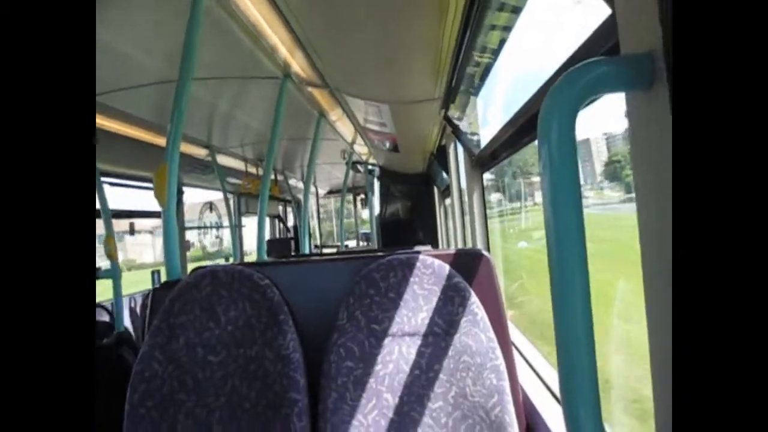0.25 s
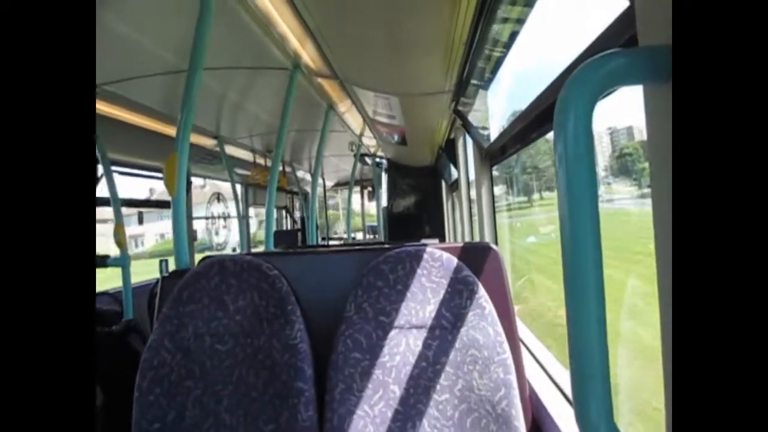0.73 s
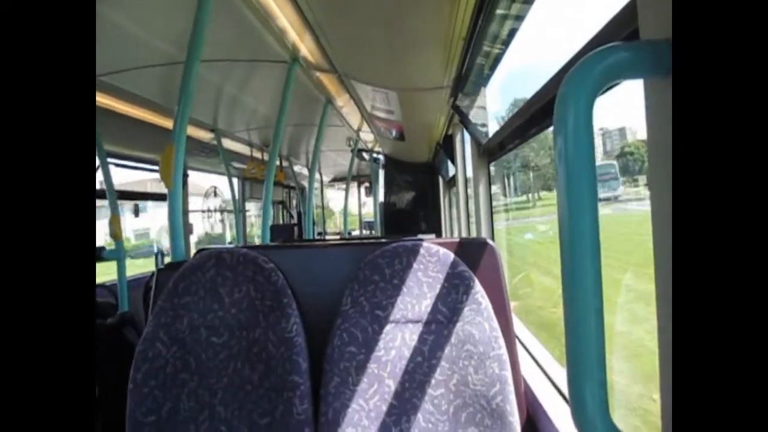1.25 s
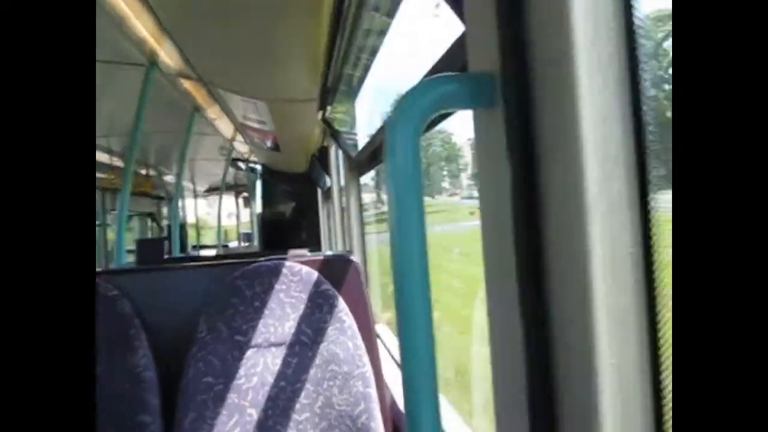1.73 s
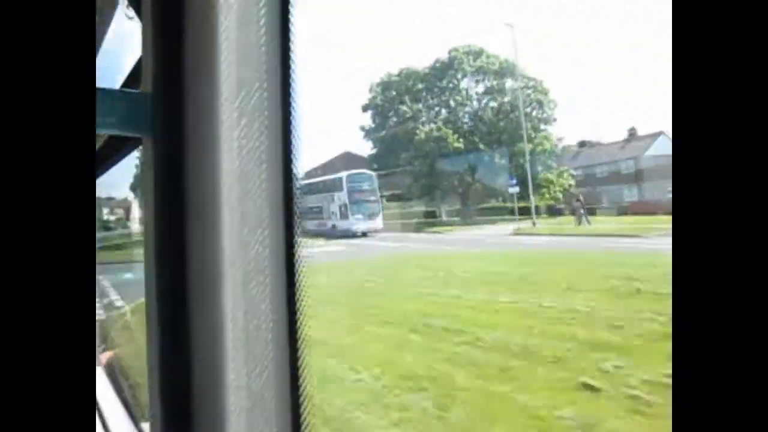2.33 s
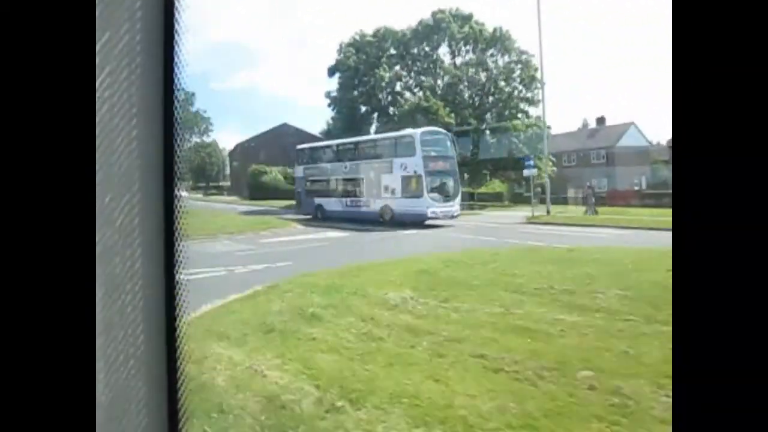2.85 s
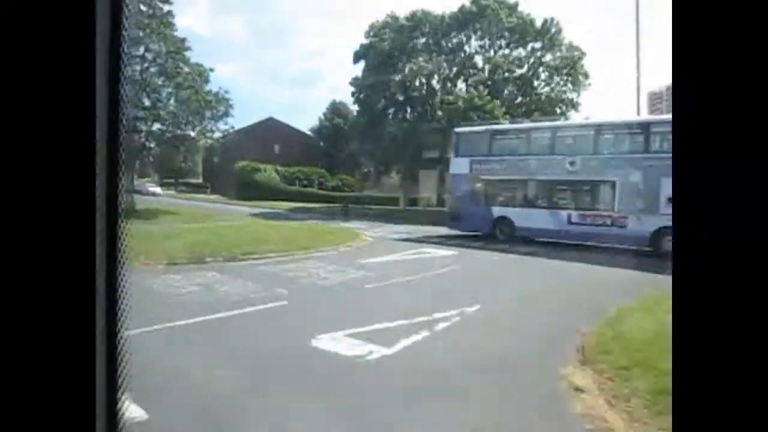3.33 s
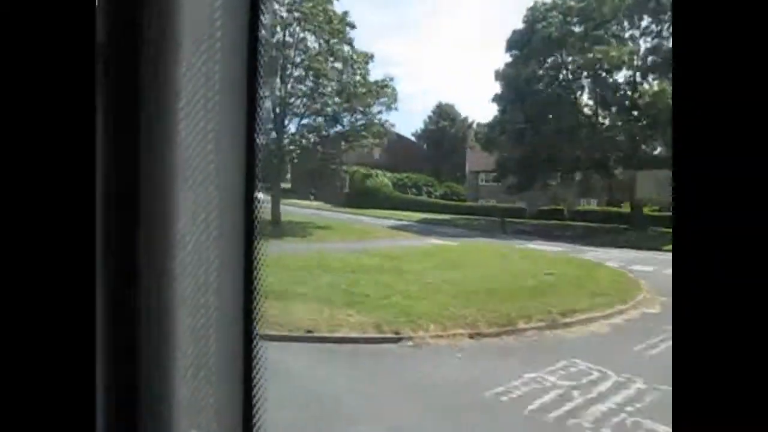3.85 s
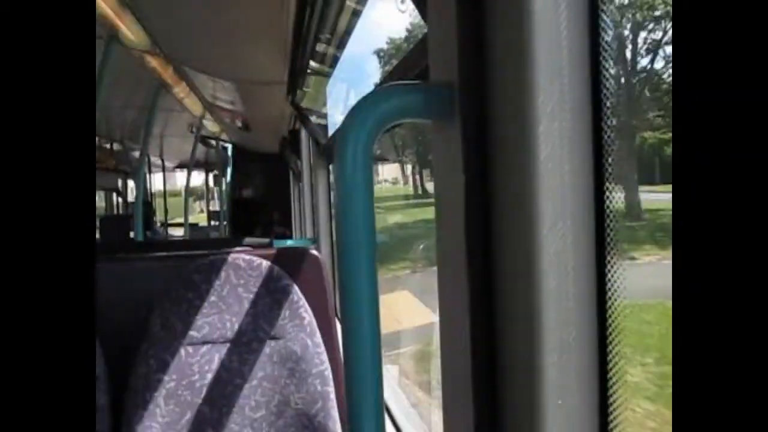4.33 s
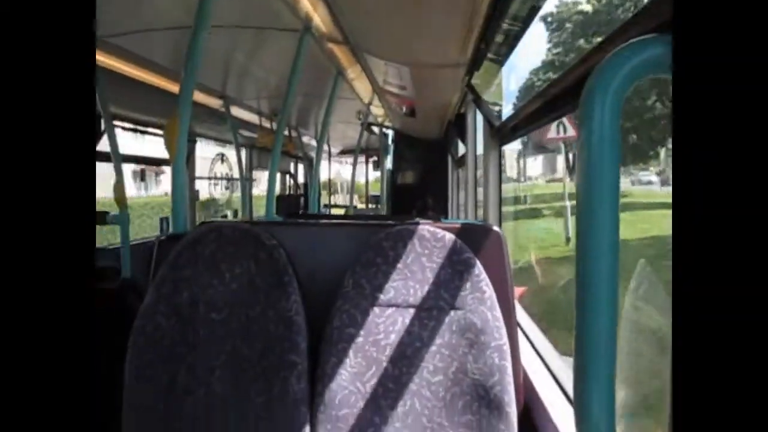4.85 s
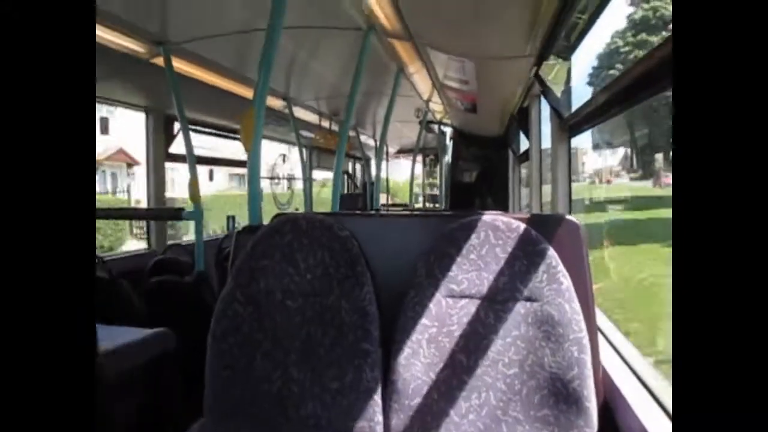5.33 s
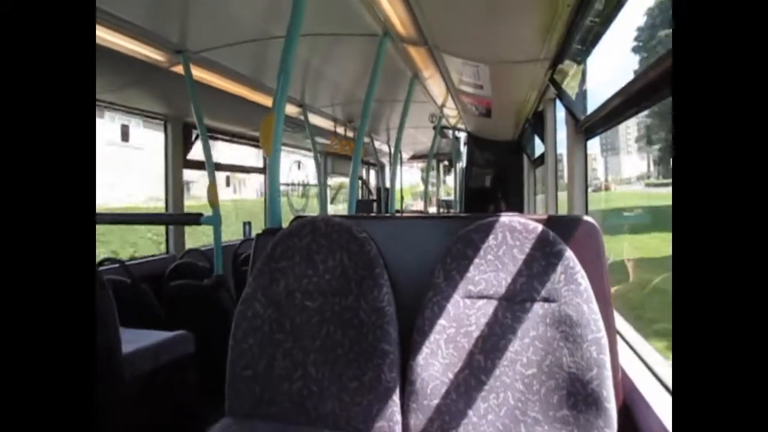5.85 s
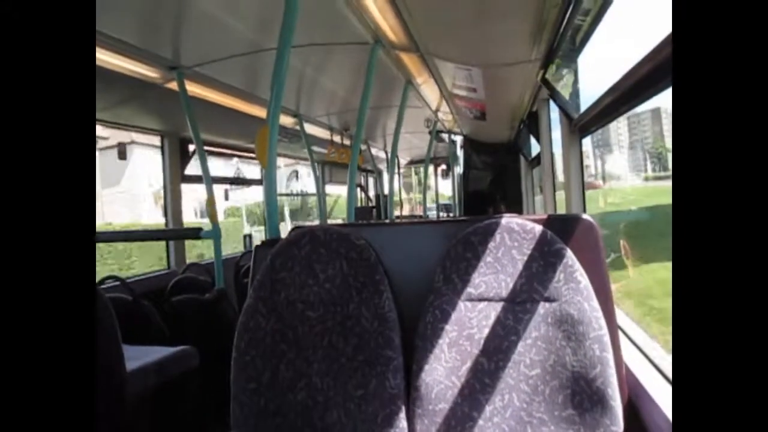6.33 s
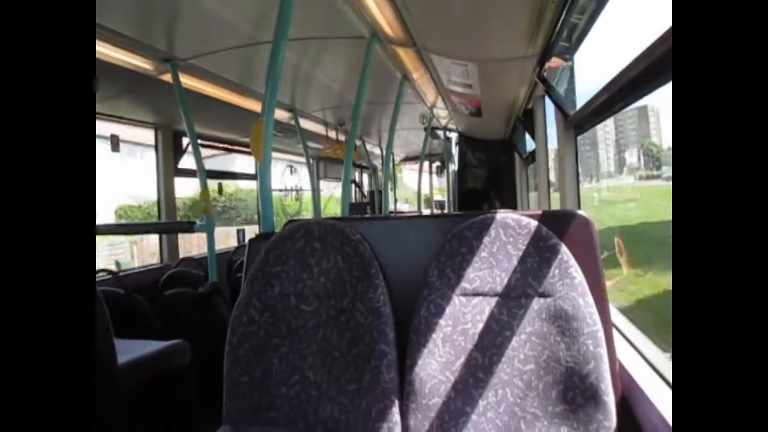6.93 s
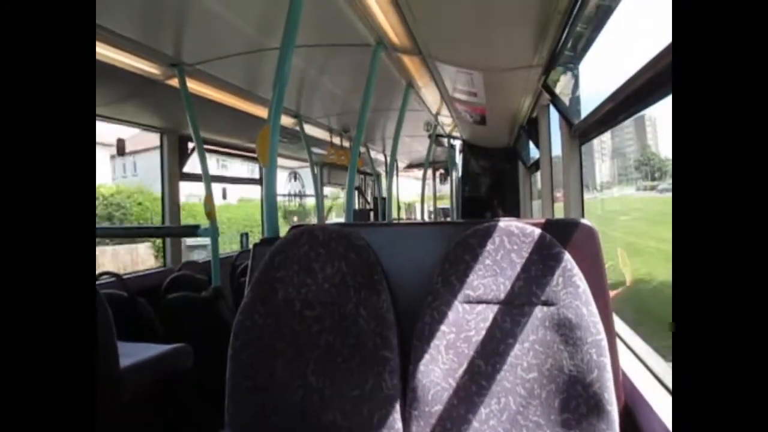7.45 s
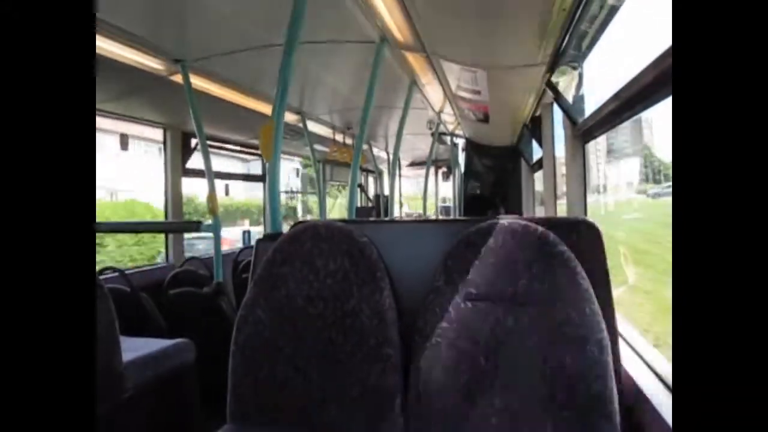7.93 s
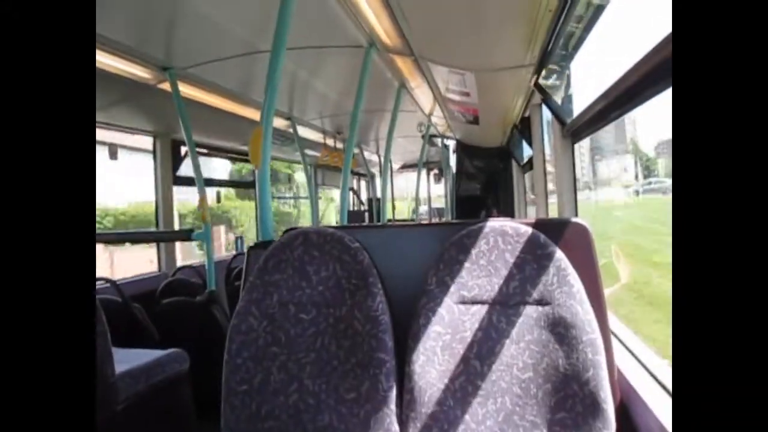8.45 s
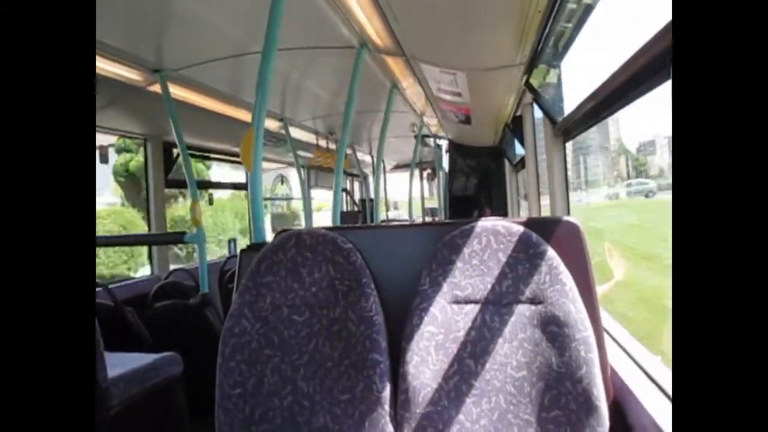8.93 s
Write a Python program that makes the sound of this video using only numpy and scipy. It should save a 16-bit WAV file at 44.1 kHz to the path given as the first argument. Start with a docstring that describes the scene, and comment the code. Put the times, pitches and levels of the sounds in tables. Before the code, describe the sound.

A small handheld microphone inside a bus picks up a nasal fan hum, engine boom, tyre roar and hissing air. Tiny metallic chirps come first, then a cluster of thumping gusts that briefly push everything down. More quick squeaks chatter, then harsher scrapes and faint ticks from the window frame. Afterwards mostly steady droning remains, its pitch finally sinking.

```python
"""Rear seats of a moving bus beside an open window: fan and engine sines over bands of road and air noise.
It opens on three handrail squeaks, slips that ring the rail; hard gusts of dull noise follow from 1.2 s.
Long squeak runs come from 2.4 s, then rougher ones around 5 s, where the detail thins for instants.
Bright window-frame ticks are scattered from 1.5 s on. The fan sags, steadies, and sags again at the end.
Throughout, the microphone's gain control ducks under loud moments and recovers."""
import sys
import numpy as np
from scipy import signal
from scipy.io import wavfile
from scipy.ndimage import uniform_filter1d

SR = 44100
rng = np.random.default_rng(int(sys.argv[2]) if len(sys.argv) > 2 else 0)


def int16_out(signal):
    """Quantize to a 16-bit WAV file."""
    q = np.round(np.clip(np.atleast_2d(signal).T, -1, 1) * 32767)
    wavfile.write(sys.argv[1], SR, q.astype(np.int16))


N = 405258  # length in samples

# Source levels below are those ahead of the microphone's gain control.
# cooling fan curve: time_s, blade_rate_hz, fundamental_db, second_harmonic_db, third_harmonic_db (rms)
FAN_CURVE = [(0, 286, -34, -34, -36.5), (1.2, 284, -34.5, -36, -37), (1.86, 281, -31, -35, -41),
             (2.0, 280.5, -32.5, -28, -48), (3.42, 277.5, -34.5, -29.5, -46),
             (3.55, 277, -34.5, -42.5, -43), (4.07, 275, -33.5, -40.5, -44), (4.25, 274, -31, -28.5, -43),
             (5, 274, -29.5, -26.5, -46), (6, 274.8, -29, -27.5, -47.5), (8, 276.5, -29, -26.5, -47),
             (8.5, 274.5, -28, -27, -45), (8.85, 271.5, -27, -26.5, -46), (9.19, 266.5, -27, -27.5, -48)]
# two low engine tones that swell and fade: time_s, exhaust_boom_db, axle_hum_db (rms)
LOW_TONE_CURVE = [(0, -25, -36.5), (1.3, -24.5, -29.5), (2.8, -36, -32.5), (3.5, -38, -37.5),
                  (4.07, -29.5, -29.5), (4.7, -39, -35), (5.8, -32.5, -35.5), (7.7, -31.5, -33.5),
                  (8.3, -29, -38), (9.19, -40, -22.5)]
# steadier engine and axle tones: order (multiple of the blade rate), level_db (rms), waver_db
SHAFT_ORDERS = [(.167, -38, 3.5), (.2, -28.5, 1.5), (0.276, -30.5, 4), (0.304, -32, 1.5), (0.337, -36, 2),
                (0.437, -40.5, 0), (0.501, -35, 4), (0.553, -35.5, 3), (0.604, -27.5, 3.5),
                (.666, -39, 3.5), (1.13, -45.5, 0.5), (1.31, -42.5, 4), (1.55, -35, 2.5),
                (2.33, -43.5, 2.5), (3.1, -39, 1.5)]
# handrail squeaks: start_s, slip_strength_db, starting_slip_rate_hz, roughness (0-1), length_s
SQUEAKS = [(0.029, -18.5, 754, 0.3, 0.02), (0.128, -24, 750, 0.4, 0.017), (0.211, -23, 744, .45, 0.015),
           (2.394, -27, 752, 0.5, 0.017), (2.472, -25, 750, .4, 0.019), (2.587, -23, 753, .15, 0.026),
           (2.683, -17.5, 750, 0.12, 0.019), (2.768, -19.5, 750, 0.14, 0.019),
           (2.857, -20, 745, 0.25, 0.017), (2.938, -24.5, 740, 0.1, 0.022), (3.018, -31.5, 748, 0.6, 0.017),
           (3.305, -27.5, 767, 0.15, .023), (3.394, -26.5, 748, 0.4, 0.022), (3.564, -26, 757, 0.2, .018),
           (3.658, -30, 750, 0.3, 0.016), (3.75, -23.5, 970, .03, 0.0097), (4.011, -25.5, 865, .45, 0.018),
           (5.043, -25.5, 743, 0.5, 0.026), (5.154, -22.5, 900, 0.92, 0.015),
           (5.27, -18.5, 755, 0.77, .013), (5.358, -13, 900, 0.73, .016), (5.451, -17.5, 900, 0.6, 0.013),
           (5.531, -30.5, 910, .9, 0.013), (5.835, -28, 883, 0.1, 0.0087), (5.975, -28, 774, .4, .012),
           (7.763, -26.5, 970, 0.64, 0.013), (8.482, -25.5, 762, .1, 0.017)]
# handrail ringing modes: pitch_hz, average_level_db, t60_s
RAIL_MODES = [(890, -8.5, 0.03), (1470, -10, 0.045), (2010, -17.5, 0.027), (2260, -4.5, 0.072),
              (2580, -1, 0.0083), (3620, -9, 0.048), (4280, -23, 0.017), (5325, -9, 0.025)]
# gusts on the microphone: start_s, peak_db, length_s
GUSTS = [(1.229, 1, .004), (1.243, 3, .028), (1.277, -4, .004), (1.350, -1, .010), (1.474, -6, .048),
         (1.523, -2, .005), (1.535, 6, .008), (1.552, -1, .024), (1.596, -4, .003), (1.609, 3, .011),
         (1.630, -6, .01), (1.776, -11, .03), (2.034, -10, .026), (2.059, -7, .012), (2.48, -9, .04),
         (2.78, -8, .02), (3.064, -7, .018), (3.083, -6, .005), (3.156, -9, .018), (4.039, -10, .02),
         (4.278, -7, .015), (5.04, -8, .025), (6.14, -9, .025)]
# noise level curve: time_s, road_roar_db, air_rush_db (rms)
NOISE_CURVE = [(0.0, -25.5, -29), (0.3, -25, -32), (1.1, -24.5, -31), (1.53, -19.5, -29.5),
               (1.9, -23, -31.5), (2.8, -25.5, -31.5), (3.1, -25.5, -35), (3.6, -21, -31),
               (4.5, -25, -30.5), (5.35, -27, -30), (6.3, -25, -32), (8.0, -25, -30.5),
               (9.19, -24.3, -30.5)]
# spectral shapes of the three noises: frequency_hz, relative_density_db (per Hz)
RUMBLE_SHAPE = [(18, -9), (35, 4), (60, -2.5), (100, -0.5), (160, 0.9), (220, -1), (260, -9), (320, -14)]
ROAR_SHAPE = [(250, -7), (320, -2), (450, -5), (600, -4), (860, -7.5), (1050, -15.5), (1400, -15.5)]
RUSH_SHAPE = [(1100, -1.5), (1500, -1.5), (2100, -5.5), (3000, -5), (4000, -8), (5500, -7.5), (7500, -17),
              (11000, -8)]
# thin ticks of the window frame: start_s, level_db (of the grit before its high-pass)
TICKS = [(1.457, -25), (2.566, -21), (5.078, -24), (5.314, -22), (5.736, -27), (5.981, -28), (6.805, -26),
         (8.758, -26)]
# instants of thinned detail: start_s, length_s
DROPOUTS = [(5.0825, 0.0018), (5.1, 0.0064), (5.308, 0.0023), (5.442, 0.0038)]

BOOM_ORDER, HUM_ORDER = 0.4, 0.775  # multiples of the blade rate
RISE_FROM_DB, RISE_PER_DB = -28, 0.23  # stronger squeaks speed up more at their end
GUST_TOP_HZ, GUST_HZ_PER_DB = 1110, 58.5  # harder gusts reach higher
RUMBLE_DB = -22.5
CABIN_T60_S, CABIN_DB = 0.13, -6.5
LIMIT_DB, RELEASE_DB_S, ATTACK_S = -8, 46, 0.0008  # gain control; release in dB per second
MIC_TOP_HZ, HISS_DB, CUTOFF_HZ = 6070, -65, 15760


def from_db(db):
    """Turn decibels into a gain."""
    return 10 ** (np.asarray(db) / 20)


def rms_one(x):
    """Scale a signal to unit rms."""
    return x / np.sqrt(np.mean(x ** 2) + 1e-20)


def in_time(rows):
    """Read the columns of a curve table, one value per sample."""
    time_s, *columns = np.transpose(rows)
    return [np.interp(np.arange(N) / SR, time_s, column) for column in columns]


def drift(rate_hz):
    """Wander slowly with spread 1: noise every 40 samples through two one-pole low-passes, run in."""
    r = np.exp(-2 * np.pi * rate_hz * 40 / SR)
    sparse = rng.standard_normal(N // 40 + 2002)
    slow = signal.lfilter([1], [1, -2 * r, r * r], sparse)[2000:]
    return np.interp(np.arange(N) / 40, np.arange(len(slow)), rms_one(slow))


def ring(clicks, hz, t60_s):
    """Ring a resonator: each unit click starts a decaying sine of height 1."""
    r = from_db(-60 / (t60_s * SR))
    w = 2 * np.pi * hz / SR
    return signal.lfilter([0, np.sin(w)], [1, -2 * r * np.cos(w), r * r], clicks + 1e-18)


def banded_noise(shape, patchy_db, together_db):
    """Sum third-octave noise bands, each with its own level and flicker, plus a shared swell; rms 1."""
    hz, density_db = np.transpose(shape)
    edges = hz[0] * 2 ** np.arange(0, np.log2(hz[-1] / hz[0]) + 0.1, 1 / 3)
    white = rng.standard_normal((2, N))  # neighbouring bands take turns on two noises
    out = 0
    for k, (low, high) in enumerate(zip(edges, edges[1:])):
        band_pass = signal.butter(2, [low, high], "band", fs=SR, output="sos")
        band = signal.sosfilt(band_pass, white[k % 2])
        band_db = np.interp(np.log(low * high) / 2, np.log(hz), density_db)
        out = out + band * from_db(band_db + patchy_db * drift(4.7))
    return rms_one(out * from_db(together_db * drift(19.7)))


def fan_and_engine():
    """Fan harmonics, engine and axle orders follow one shaft speed; each wavers in level and phase."""
    blade_hz, *fan_db = in_time(FAN_CURVE)
    turn = 2 * np.pi * np.cumsum(blade_hz) / SR
    out = np.zeros(N)
    curve_orders = [1, 2, 3, BOOM_ORDER, HUM_ORDER]
    for order, level_db in zip(curve_orders, fan_db + in_time(LOW_TONE_CURVE)):
        gain = from_db(level_db + 1.0 * drift(7))
        out += gain * np.sin(order * turn + 0.2 * drift(4))
    for order, level_db, waver_db in SHAFT_ORDERS:
        gain = from_db(level_db + waver_db * np.tanh(drift(2.14)))  # tanh bounds the waver
        out += gain * np.sin(order * turn + 1.31 * drift(4.0))
    return np.sqrt(2) * out  # table levels are rms


def handrail():
    """Stick-slip: each run of slips swells, may speed up at its end, and rings the rail at another spot."""
    slips, spot_db = np.zeros(N), np.zeros((len(RAIL_MODES), N))
    for start_s, strength_db, slip_hz, rough, length_s in SQUEAKS:
        u = np.linspace(0, 1, round(length_s * SR))
        rough = np.clip(rough, 0, 1)
        rise = max(RISE_PER_DB * (strength_db - RISE_FROM_DB), 0)
        slip_count = np.floor(np.cumsum(slip_hz * (1 + rise * u ** 3.5)) / SR)
        regular = np.diff(slip_count, prepend=0)  # one click per slip
        scrape = 0.22 * rms_one(rng.standard_normal(2000)[:len(u)])  # grit blurs the regular slips
        swell = (0.36 + 0.6 * u ** 3.1) * np.minimum(1, 5 * (1 - u))
        start = round(start_s * SR)
        run = slice(start, start + len(u))
        slips[run] += from_db(strength_db) * swell * ((1 - rough) * regular + rough * scrape)
        spot_db[:, run] = 1.5 * rng.standard_normal((len(RAIL_MODES), 1))
    modes = np.zeros(N)
    for k, (hz, level_db, t60_s) in enumerate(RAIL_MODES):
        modes += (-1) ** k * ring(slips * from_db(level_db + spot_db[k]), hz, t60_s)
    # the damped mounting passes the glide itself
    contact = ring(slips, 1960, 0.0021) + 1.1 * ring(slips, 3780, 0.0009)
    return modes + from_db(10.5) * contact


def gusts():
    """Each gust is a lump of dull turbulent pressure right at the microphone port."""
    out = np.zeros(N)
    for start_s, peak_db, length_s in GUSTS:
        size = round(length_s * SR)
        top_hz = max(GUST_TOP_HZ + GUST_HZ_PER_DB * peak_db, 300)
        lump = rng.standard_normal(4000)
        lump[size:] = 0  # room left for the filters to settle
        lump[:size] *= np.hanning(size) ** 0.3  # it swells and fades
        lump = signal.sosfilt(signal.butter(2, [120, top_hz], "band", fs=SR, output="sos"), lump)
        # large eddies carry the most pressure: low-pass at 450 Hz
        lump = signal.lfilter([1], [1, -np.exp(-2 * np.pi * 450 / SR)], lump)
        start = round(start_s * SR)
        out[start:start + 4000] += from_db(peak_db) * lump / np.abs(lump).max()
    return out


def window_ticks():
    """Each tick is a few milliseconds of bright, quickly decaying grit."""
    out = np.zeros(N)
    fade = np.exp(-np.arange(600) / (0.003 * SR))
    for start_s, level_db in TICKS:
        start = round(start_s * SR)
        out[start:start + 600] += from_db(level_db) * fade * rng.standard_normal(600)
    return signal.sosfilt(signal.butter(2, 4000, "high", fs=SR, output="sos"), out)


def road(roar_db):
    """A flickering low rumble holds its average level under a roar that follows the level curve."""
    rumble = from_db(RUMBLE_DB) * banded_noise(RUMBLE_SHAPE, patchy_db=1.0, together_db=-1.6)
    roar = from_db(roar_db) * banded_noise(ROAR_SHAPE, patchy_db=-1.5, together_db=0.66)
    return rumble + roar


def air_rush(rush_db):
    """Air past the open window is bright broadband noise that flickers band by band."""
    return from_db(rush_db) * banded_noise(RUSH_SHAPE, patchy_db=0.86, together_db=1.2)


def cabin(x):
    """Glass and seats add a short diffuse tail of decaying noise."""
    t = np.arange(round(0.2 * SR)) / SR
    tail = rng.standard_normal(len(t)) * from_db(-60 * t / CABIN_T60_S) * (t > 0.003)
    tail /= np.sqrt(np.sum(tail ** 2))
    return x + from_db(CABIN_DB) * signal.fftconvolve(x, tail)[:N]


def scene():
    """Mix all sources at the seat into one channel."""
    roar_db, rush_db = in_time(NOISE_CURVE)
    rattles = cabin(handrail() + window_ticks())
    mix = fan_and_engine() + rattles + gusts() + road(roar_db) + air_rush(rush_db)
    return mix[None]


def thin_detail(x):
    """For instants, everything but the dull part below about 250 Hz drops to a fifth."""
    t, detail_gain = np.arange(N) / SR, np.ones(N)
    for start_s, length_s in DROPOUTS:
        detail_gain[(t > start_s) & (t < start_s + length_s)] = 0.2
    dull = signal.sosfilt(signal.butter(2, 250, fs=SR, output="sos"), x)
    return dull + uniform_filter1d(detail_gain, size=20) * (x - dull)


def gain_control(x):
    """Peaks over the limit duck the level fast; it recovers at a steady rate in decibels."""
    released_db = RELEASE_DB_S * np.arange(N) / SR
    over_db = np.maximum(20 * np.log10(np.abs(x) + 1e-9) - LIMIT_DB, 0)
    held_db = np.maximum.accumulate(over_db + released_db) - released_db
    r = np.exp(-1 / (ATTACK_S * SR))
    return x * from_db(-signal.lfilter([1 - r], [1, -r], held_db))


def record(dry):
    """Thin the detail, control the gain, round the peaks, narrow the band, add hiss and cut the top."""
    x = gain_control(thin_detail(dry[0]))
    x = 0.7 * np.tanh(x / 0.67)  # soft overload
    x = signal.sosfilt(signal.butter(6, MIC_TOP_HZ, fs=SR, output="sos"), x)  # narrow audio channel
    x = x + from_db(HISS_DB) * rng.standard_normal(N)  # circuit hiss
    return signal.sosfilt(signal.ellip(12, 0.5, 70, CUTOFF_HZ, fs=SR, output="sos"), x)[None]


dry = scene()
out = record(dry)
int16_out(out)
```